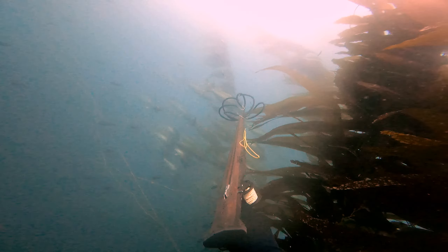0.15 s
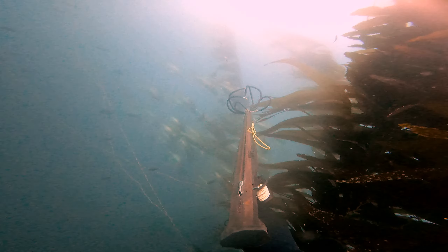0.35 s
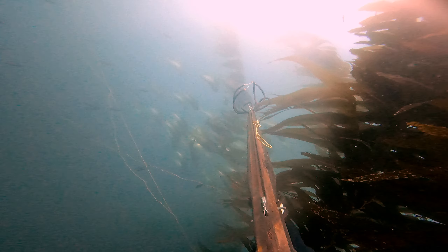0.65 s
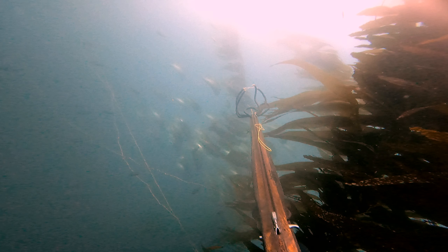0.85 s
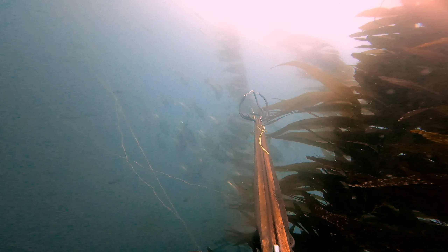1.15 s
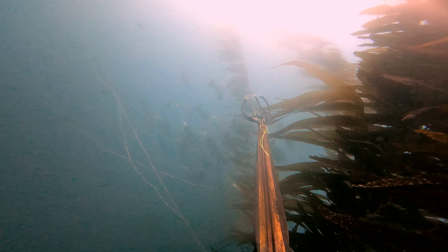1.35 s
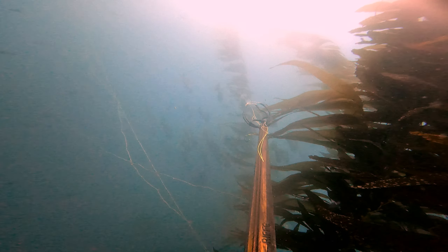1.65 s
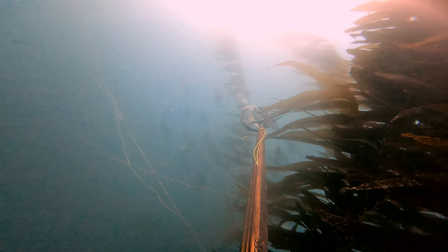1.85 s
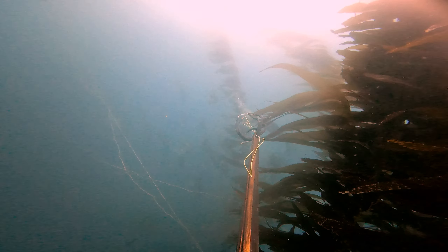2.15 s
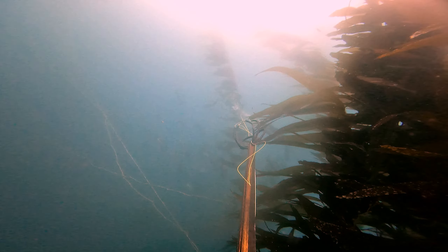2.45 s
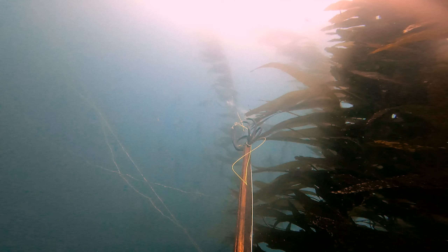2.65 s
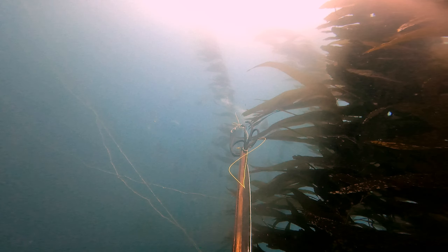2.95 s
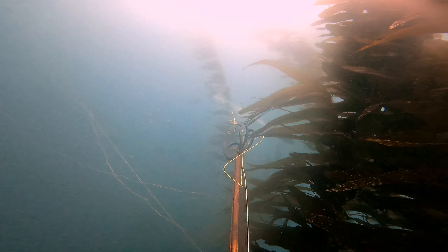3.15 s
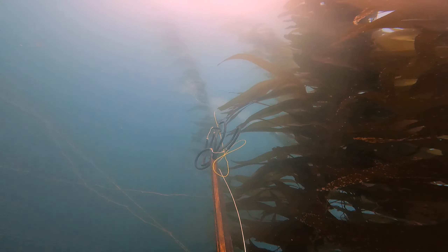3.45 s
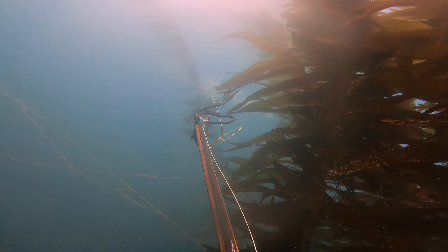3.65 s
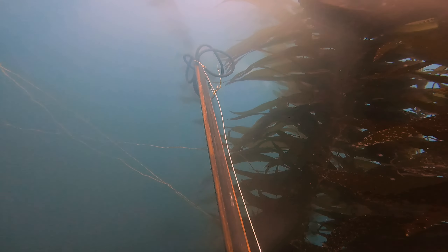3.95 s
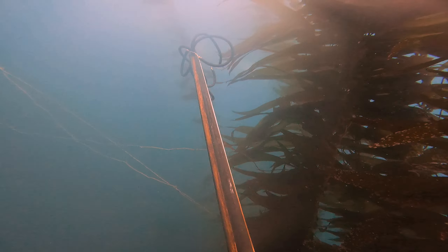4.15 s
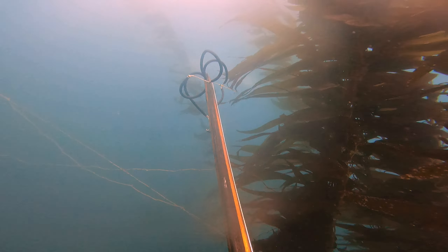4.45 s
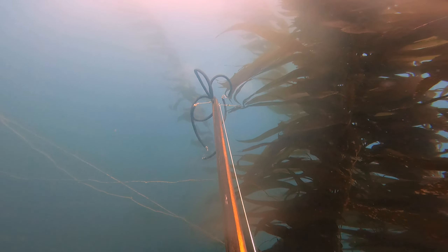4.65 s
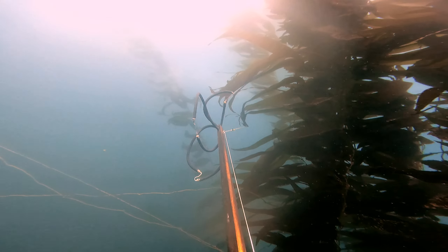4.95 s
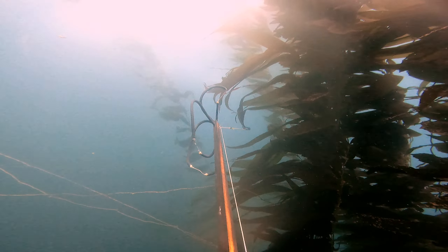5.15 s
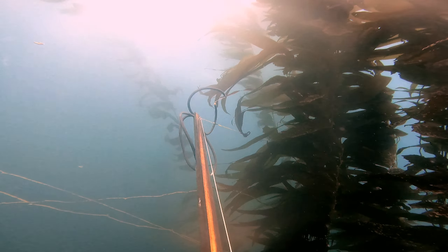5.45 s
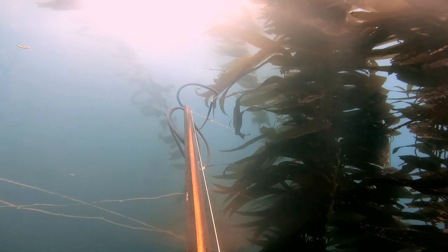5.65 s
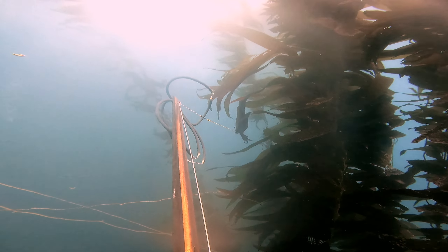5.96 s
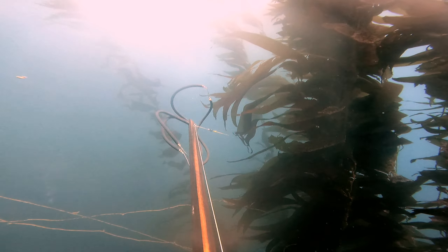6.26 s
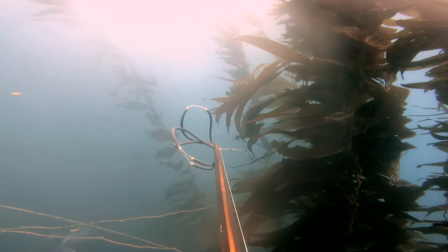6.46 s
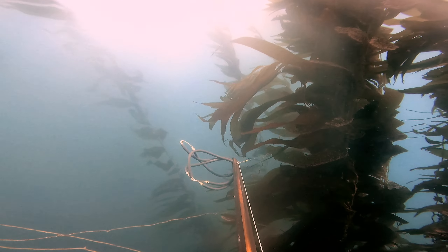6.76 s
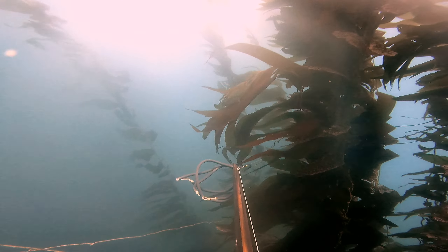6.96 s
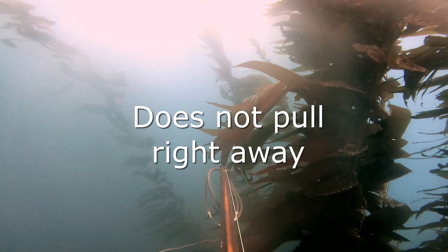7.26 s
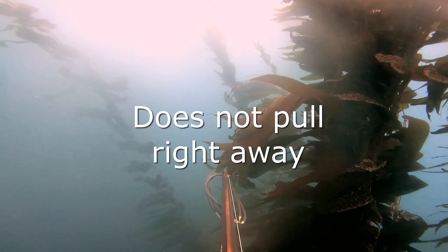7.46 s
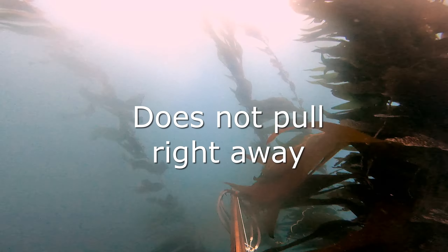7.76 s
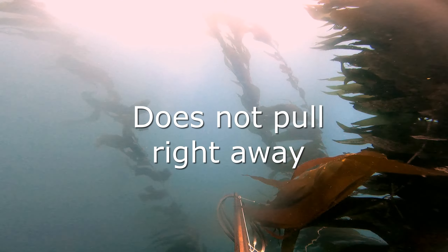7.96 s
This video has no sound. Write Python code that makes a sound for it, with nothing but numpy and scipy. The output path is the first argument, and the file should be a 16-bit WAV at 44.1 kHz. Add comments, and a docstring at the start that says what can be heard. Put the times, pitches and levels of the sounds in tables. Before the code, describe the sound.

Underwater, a rubber-band speargun fires in slow motion with one huge dull thump and low clanks, then normal-speed water rumble, shrimp crackle and small knocks.

```python
"""Under water beside kelp, heard through a camera housing, a rubber-band speargun fires.
The shot is slowed fivefold: decaying low tones thump, steel modes of the shaft clank and its line taps the stock.
At full speed, filtered noise makes water rumble on the housing and line and kelp rub the gun.
Shrimp crackle as scattered clicks; wishbones, line clip and rubber bands ring short modes.
Bubbles chirp as gliding tones, and a squeezed pocket of air gurgles."""
import sys
import numpy as np
from scipy import signal
from scipy.fft import rfft, irfft, next_fast_len
from scipy.io import wavfile
from scipy.ndimage import uniform_filter1d, map_coordinates

SR = 44100
rng = np.random.default_rng(int(sys.argv[2]) if len(sys.argv) > 2 else 0)


def to_wav(sig):
    """Store sig (one row per channel, or 1-D mono) as 16-bit WAV at the path in sys.argv[1].

    Samples outside -1..1 are clipped; the rate is SR.
    """
    pcm = np.clip(np.atleast_2d(sig), -1, 1) * 32767
    pcm = np.round(pcm).astype(np.int16)
    wavfile.write(sys.argv[1], SR, pcm.T)  # frames by channels


N = 357210
TIME = np.arange(N) / SR  # s

FULL_SPEED_AT = 3.212  # s, slow motion before it
SLOW = 5.0  # times longer and lower
EDGE_HZ = 15700  # upper band edge
THUMP_RISE_CYCLES = 0.51  # from the blow to its strongest moment
POCKET_HZ, POCKET_SAG_HZ_PER_S = 276.6, 606  # the air pocket sinks in pitch late in the squeeze

# Spectra give relative density; mode levels are relative too.
# housing resonances: pitch_hz, width_hz, boost_db
HOUSING = [(740, 300, 12), (1250, 90, 3), (2020, 520, 12), (3472, 330, 10.5), (4980, 290, 8.5),
           (7200, 350, 1)]

# dull blows on the stock, as heard: start_s, level_db, settled_pitch_hz
THUMPS = [(0.068, -16.5, 84.2), (0.1384, -3, 65.5), (0.778, -30, 147), (0.84, -36, 156), (1.532, -48, 124),
          (2.401, -42.5, 184), (3.218, -36.5, 245), (4.0008, -16.5, 146.5), (4.02, -26.5, 84.6),
          (4.041, -30, 130), (4.146, -31.5, 122), (4.5, -33, 216), (5.117, -34, 159), (5.244, -35, 151),
          (5.455, -38.5, 260), (5.494, -38.5, 229), (7.57, -26.5, 210), (7.597, -31, 245),
          (7.7274, -18, 180), (8.064, -22.5, 135)]
# recoil rocks the gun: start_s, length_s, level_db, sway_hz
SWAYS = [(0.024, 0.21, -9.5, 4.07), (0.462, 0.19, -8, 4.53)]
# bands, then shaft, rush through the water: start_s, length_s, level_db
RUSHES = [(0, 0.1, -32.5), (.425, 0.037, -36), (.885, 0.021, -47.5)]
# the rush at full speed: pitch_hz, density_db_per_hz
RUSH_SPECTRUM = [(100, -8.5), (250, -4.5), (500, -12), (900, 2.5), (1500, -9), (2500, -19.5), (4500, -22.5),
                 (5600, -28), (8500, -36.5), (10500, -65)]
# the shaft strikes its track: start_s, peak_db, favoured_hz (as heard)
CLANKS = [(0.016, -29, 450), (0.4267, -18.5, 700), (0.4348, -26, 750), (.4475, -35.5, 940),
          (0.509, -31, 1002), (.546, -34, 350), (0.573, -29.5, 403), (0.636, -38.5, 420), (.68, -44.5, 957)]
# steel shaft at full speed: pitch_hz, level_db, t60_s
SHAFT_MODES = [(1290, 13, 0.014), (2070, 1.5, 0.0061), (2817, 2.5, 0.036), (3490, 1.5, 0.0099),
               (4200, -6.5, 0.014), (4980, -2.5, 0.018), (7500, -12, 0.017)]
# contact noise of the shaft at full speed: pitch_hz, density_db_per_hz
SHAFT_CONTACT = [(300, -5.5), (1100, 4), (2500, 0), (5000, -8.5), (7500, -29), (11000, -35), (15500, -40),
                 (17000, -61.5)]
# the shaft slides along its track in slow motion: start_s, length_s, level_db
SLIDES = [(0.47, 0.084, -44)]
# its slowed grinding, as heard: pitch_hz, density_db_per_hz
SLIDE_SPECTRUM = [(80, -13.5), (160, 2.5), (410, 4.5), (490, -15.5), (570, -5), (1000, -23.5),
                  (1400, -33.5), (2000, -49.5)]

# the rubber bands bump the gun: start_s, peak_db, favoured_hz
BUMPS = [(3.67, -49.5, 740), (4.0008, -35, 850), (4.5, -39.5, 700), (4.794, -47.5, 680), (5.008, -48, 740),
         (6.167, -38, 750), (6.1805, -42.5, 900), (6.257, -43, 1300), (6.287, -44, 950), (6.399, -48, 1100),
         (7.567, -46, 520)]
# hollow body of the gun: pitch_hz, level_db, t60_s
BODY_MODES = [(697, 0, 0.033), (846, -5.5, 0.026), (1300, -6, 0.029), (1820, -14.5, 0.023)]
# the wishbones touch the gun: start_s, peak_db, favoured_hz
CLINKS = [(3.9335, -43, 2200), (4.006, -48.5, 2600), (4.4462, -36, 2800), (4.4548, -31.5, 3000),
          (4.4995, -46, 2400), (5.1769, -48.5, 1940), (5.815, -40.5, 2300)]
# steel wishbones on the bands: pitch_hz, level_db, t60_s
WISHBONE_MODES = [(1820, -1, 0.04), (1880, -7.5, 0.036), (2088, 11.5, 0.053), (3430, -5.5, 0.05),
                  (3470, 5.5, 0.064), (4720, -2, 0.033)]
# contact noise of small steel parts: pitch_hz, density_db_per_hz
STEEL_CONTACT = [(300, -20.5), (800, -8.5), (1800, 1.5), (2700, -5.5), (3400, 0.5), (4200, -10), (4800, -7),
                 (5700, -18.5), (7800, -13), (9000, -26), (10000, -36), (15000, -35)]
# loose steel rattles against the muzzle: start_s, length_s, level_db
RATTLES = [(3.633, 0.015, -61), (3.93, 0.017, -62.5), (4.15, 0.069, -60.5), (4.448, 0.018, -52),
           (4.483, 0.022, -58), (5.248, 0.02, -63)]
# the line clip knocks on the stock: start_s, peak_db
KNOCKS = [(7.011, -28.5), (7.0202, -31), (7.029, -41), (7.129, -45)]
# the line clip: pitch_hz, level_db, t60_s
LINE_CLIP_MODES = [(872, 7, 0.053), (1210, 11, 0.035), (1324, 6, 0.056), (1525, 1.5, 0.11),
                   (2150, -1, 0.049), (2820, -9, 0.14), (3150, -12, 0.1), (4240, -15, 0.1)]

# the running line taps the stock in slow motion: start_s, peak_db, favoured_hz (as heard)
TAPS = [(1.725, -44, 550), (1.776, -45.5, 567), (1.893, -48.5, 385), (2.396, -51, 513), (2.955, -51, 695),
        (2.988, -45.5, 654)]
# the stock at full speed: pitch_hz, level_db, t60_s
STOCK_MODES = [(1904, 0.5, 0.022), (2207, 3, 0.029), (2785, -1.5, 0.026), (3573, -0.5, 0.02),
               (5250, -16, 0.031)]
# line runs out behind the shaft in slow motion: start_s, length_s, level_db
RUN_OUT = [(1.72, 0.06, -64), (2.38, 0.49, -71)]
# its slowed rubbing, as heard: pitch_hz, density_db_per_hz
RUN_OUT_SPECTRUM = [(300, -18.5), (440, 10), (570, 8.5), (680, 2.5), (800, -13.5), (1100, -19.5),
                    (1800, -44)]
# line slides along the gun: start_s, length_s, level_db
RUBS = [(6.22, 0.073, -62), (6.6, 0.67, -57)]
# rubbing of the line: pitch_hz, density_db_per_hz
RUB_SPECTRUM = [(250, 0.5), (870, 9), (1050, 1.5), (1350, 4.5), (1700, 4), (2000, -19.5), (3000, -12.5),
                (3600, -25), (4400, -10), (9000, -38)]
# the taut line scrapes through its guide: start_s, length_s, level_db
SCRAPES = [(5.817, 0.0053, -57.5), (6.287, 0.0061, -59), (6.627, 0.014, -58), (6.863, 0.012, -54.5),
           (6.913, 0.004, -62), (7.202, 0.0091, -58.5)]
# sound of the guide: pitch_hz, density_db_per_hz
GUIDE_SPECTRUM = [(1000, -8), (2500, -6.5), (2900, 3.5), (3300, -8), (4200, 6.5), (5000, -7), (5700, -12.5),
                  (6600, -13), (8500, -27.5), (10000, -42)]
# kelp fronds brush the gun: start_s, length_s, level_db
BRUSHES = [(4.02, 0.024, -54), (4.39, 0.07, -51.5), (5.0, 0.045, -62.5), (7.6, 0.11, -52.5),
           (7.83, 0.2, -61)]
# brushing of the kelp: pitch_hz, density_db_per_hz
KELP_SPECTRUM = [(200, -8), (330, 8.5), (500, -9), (730, 6.5), (900, -18.5), (1200, -24), (6000, -37)]

# trapped air is squeezed out, one row: start_s, length_s, level_db
SQUEEZE = (7.6, 0.293, -41.5)
# small bubbles break from it in spurts: start_s, length_s, level_db
SPURTS = [(7.64, 0.094, -52), (7.83, 0.29, -64)]
# jolts shake loose clouds of tiny bubbles: start_s, length_s, peak_db, middle_hz
SPRAYS = [(3.327, 0.13, -59, 3520), (5.816, 0.07, -52.5, 1900), (6.268, 0.1, -49.5, 950),
          (7.035, 0.077, -46, 1644)]
# single bubbles, as heard: start_s, level_db, initial_pitch_hz, length_s, glide_octaves
CHIRPS = [(0.173, -55, 1368, 0.013, 0), (0.36, -65, 1510, .03, -0), (1.864, -71, 1660, 0.041, 0),
          (2.505, -67, 1136, 0.093, 0.05), (2.563, -70.5, 1340, 0.056, -0),
          (3.322, -61.5, 3330, 0.021, 0.47), (3.341, -59, 2445, 0.046, 0.064),
          (3.47, -65.5, 3700, 0.023, 0.9), (7.646, -45, 643, 0.029, -0.2), (7.71, -44, 575, 0.021, 0.1),
          (7.708, -48.5, 940, 0.05, 0.08)]

# the nearest snaps, mostly shrimp: start_s, peak_db, favoured_hz
SNAPS = [(4.308, -50.5, 1800), (4.1986, -51, 2000), (4.227, -54, 4600), (4.9785, -49, 5000),
         (5.267, -45, 4660), (5.64, -47, 5400), (6.132, -49, 1800), (6.627, -44, 5200), (7.235, -46, 2800)]
# far shrimp before the housing: pitch_hz, density_db_per_hz
FAR_SHRIMP = [(200, -14.5), (350, 5.5), (500, -1), (800, 0.5), (1100, -0.5), (1500, -5), (2500, -8),
              (4200, -13.5), (6000, -20), (8500, -28), (10000, -51.5), (15000, -45.5)]
# near shrimp before the housing: pitch_hz, density_db_per_hz
NEAR_SHRIMP = [(300, -23.5), (700, 3), (1400, 4.5), (2500, 1), (4500, -4.5), (6500, -6.5), (8600, -7),
               (10000, -37), (15000, -42.5)]
# common level curve of far and near shrimp: time_s, level_db
SHRIMP_LEVEL = [(0, -51), (.8, -52.5), (1.58, -67.5), (1.74, -57), (3.12, -63), (3.25, -58.5), (5.2, -59),
                (6.8, -62.5), (7.8, -58.5), (8.1, -51)]
# water washes past as the gun swings round: start_s, length_s, level_db
WASHES = [(7.895, 0.25, -63)]
# its hiss before the housing: pitch_hz, density_db_per_hz
WASH_SPECTRUM = [(1400, 5), (2000, -7), (3550, -3), (4300, -8), (9000, -21.5)]
# the gun moves and water surges over the housing: start_s, length_s, level_db (over the resting flow)
SURGES = [(0, 0.36, 12.5), (.52, 0.2, 15), (.96, 0.24, 8.5), (1.77, 0.46, -1), (2.38, 0.048, 6.5),
          (2.71, 0.19, 3), (3.24, 0.16, 10), (4.0, 0.061, 10.5), (4.4, 0.013, 8), (6.32, 0.074, 8),
          (6.58, 0.65, 8.5), (7.65, 0.097, 9.5), (7.98, 0.11, 13.5)]
# the slowed flow, as heard: pitch_hz, density_db_per_hz
SLOW_FLOW = [(6, 7.5), (16, -3.5), (35, -10.5), (70, -27.5), (110, -37.5), (250, -65.5)]
# full-speed flow on the housing: pitch_hz, density_db_per_hz
FLOW = [(12, -1), (28, 4), (55, -3.5), (80, -13), (115, -21), (200, -33.5), (330, -39.5), (600, -58)]
# eddies on the housing: pitch_hz, density_db_per_hz
EDDIES = [(50, -22.5), (100, -8.5), (155, 3.5), (220, -8.5), (310, -12), (420, -22.5), (600, -33.5),
          (1200, -50)]


def recoil():
    """Oscillation: the recoiling gun rocks at a few hertz while each sway swells and dies."""
    out = np.zeros(N)
    for s, length, db, hz in SWAYS:
        swell = strokes([(s, length, db)], rise_s=0.023, fall_s=0.042)
        out += swell * np.cos(2 * np.pi * hz * (TIME - s))
    return out


def rush():
    """Turbulence: bands and shaft tear through water as clicks and noise, slowed."""
    tear = unit(grains(350, 1.9) + 1.7 * rng.standard_normal(N))
    gain = strokes(RUSHES, rise_s=0.021, fall_s=0.039)
    return gain * unit(colour(tear, RUSH_SPECTRUM, SLOW, housed=True))


def thumps(sag=0.043, push=0.19):
    """Heavy damping: water stills each blow within a few cycles, and its pitch sags as it dies."""
    out, t = np.zeros(N), np.arange(SR // 3) / SR
    for s, db, hz in THUMPS:
        u = t * hz / THUMP_RISE_CYCLES
        turns = np.cumsum(hz * (1 + sag * np.exp(-u / 2))) / SR
        envelope = (u * np.exp(1 - u)) ** 1.17
        add(out, s, amp(db) * envelope * (push - np.sin(2 * np.pi * turns)))
    return out


def clanks(crack_db=0.0, contact_s=0.00026, octaves=2.3):
    """Modal excitation: the shaft's slowed steel modes ring above a rough contact crack."""
    out, t = np.zeros(N), np.arange(SR // 2) / SR / SLOW
    cushion = 1 - np.exp(-t / contact_s)  # water cushions the first touch
    for s, db, hz in CLANKS:
        crack = colour(burst(t, 0.00077, 0.01, -20) * cushion, SHAFT_CONTACT, SLOW)
        lowpass = signal.butter(6, 1500, fs=SR, output="sos")
        steel = signal.sosfilt(lowpass, ring(t, SHAFT_MODES) * cushion)
        blow = peaked(steel, 0) + peaked(crack, crack_db)
        add(out, s, peaked(struck(blow, hz, octaves), db))
    return out


def bumps(octaves=0.7, contact_s=0.0006, crack_db=-4.5):
    """Soft impact: rubber rings only the low, hollow modes of the gun."""
    out, t = np.zeros(N), np.arange(SR // 6) / SR
    cushion = 1 - np.exp(-t / contact_s)
    slap_spectrum = [(300, -11.5), (520, -7), (750, 1), (1400, -6.5), (2600, -13.5), (8000, -18.5)]
    for s, db, hz in BUMPS:
        slap = colour(burst(t, 0.0026, 0.031, -12.5) * cushion, slap_spectrum)
        bump = peaked(ring(t, BODY_MODES) * cushion, 0) + peaked(slap, crack_db)
        add(out, s, peaked(struck(bump, hz, octaves), db))
    return out


def clinks(octaves=0.71, crack_db=4.0, contact_s=0.00048):
    """Modal excitation: a rough clack through the housing, with a short ring of the wishbone."""
    out, t = np.zeros(N), np.arange(SR // 4) / SR
    cushion = 1 - np.exp(-t / contact_s)
    for s, db, hz in CLINKS:
        clack = colour(burst(t, 0.0015, 0.036, -26.0) * cushion, STEEL_CONTACT, housed=True)
        touch = peaked(ring(t, WISHBONE_MODES) * cushion, -3.5) + peaked(clack, crack_db)
        add(out, s, peaked(struck(touch, hz, octaves), db))
    return out


def rattles(per_s=600, spread_db=5.5):
    """Repeated impact: many tiny steel contacts are coloured by the housing."""
    contacts = grains(per_s, spread_db) + 0.42 * rng.standard_normal(N)
    gain = strokes(RATTLES, rise_s=0.002, fall_s=0.013)
    return gain * unit(colour(contacts, STEEL_CONTACT, housed=True))


def knocks(crack_db=4, contact_s=0.00023):
    """Modal excitation: the line clip rings as it hits the stock and bounces, with a rough tail."""
    out, t = np.zeros(N), np.arange(SR // 4) / SR
    cushion = 1 - np.exp(-t / contact_s)
    crack_spectrum = [(400, 7.5), (800, -6.0), (1400, 17.5), (2200, 2.5),
                      (4200, 0.0), (5200, -21), (8500, -25), (10000, -52)]
    for s, db in KNOCKS:
        crack = colour(burst(t, 0.002, 0.025, -13), crack_spectrum)
        knock = peaked(ring(t, LINE_CLIP_MODES) * cushion, 0) + peaked(crack, crack_db)
        add(out, s, peaked(knock, db))
    return out


def taps(octaves=0.5, contact_s=0.00044, crack_db=-5):
    """Time stretching: each slowed tap of the line is a hollow knock that rings the stock."""
    out, t = np.zeros(N), np.arange(SR // 3) / SR / SLOW
    cushion = 1 - np.exp(-t / contact_s)
    for s, db, hz in TAPS:
        crack = colour(burst(t, 0.00073, 0.0071, -7.5) * cushion, SHAFT_CONTACT, SLOW)
        knock = peaked(ring(t, STOCK_MODES) * cushion, 0) + peaked(crack, crack_db)
        add(out, s, peaked(struck(knock, hz, octaves), db))
    return out


def rub(rows, spectrum, rise_s, fall_s):
    """Stick-slip friction: a sliding contact sounds as many tiny slips of uneven strength."""
    slips = grains(900, 1.7) + 0.62 * rng.standard_normal(N)
    uneven = slips * amp(2.3 * drift(70))
    return strokes(rows, rise_s, fall_s) * unit(colour(uneven, spectrum))


def gurgle(sag_after_s=0.19, slack_hz=195, small_hz=690, wander=0.1, throb_wander=0.0807,
           throb_db=4, churn=0.88):
    """Bubble resonance: a squeezed pocket throbs and sinks in pitch as small bubbles break from it."""
    sagging_s = np.maximum(TIME - SQUEEZE[0] - sag_after_s, 0)
    pocket_hz = np.maximum(POCKET_HZ - POCKET_SAG_HZ_PER_S * sagging_s, slack_hz)
    turns = np.cumsum(pocket_hz * (1 + throb_wander * drift(90))) / SR
    throb = np.sin(2 * np.pi * turns) * amp(throb_db * drift(70))
    churning = resonate(grains(500, 0.42), pocket_hz * 0.85, 100)
    pocket = unit(unit(throb) + churn * churning) * strokes([SQUEEZE], rise_s=0.015, fall_s=0.05)
    small = resonate(grains(500, 2.0), small_hz * (1 + wander * drift(25)), 190)
    return pocket + small * strokes(SPURTS, rise_s=0.05, fall_s=0.032)


def blip(hz, cycles, rise):
    """Bubble resonance: one bubble rings briefly and rises in pitch."""
    u = np.arange(int(3 * cycles * SR / hz)) * hz / (cycles * SR)
    envelope = 3 * u * np.exp(1 - 3 * u)
    return envelope * np.sin(2 * np.pi * cycles * (u + rise * u * u / 4))


def sprays(octaves=0.894, cycles=9, rise=0.33, spread_db=12, thinning_db=9, count=70):
    """Superposition: a jolt frees a cloud of tiny bubbles, fainter as it goes."""
    out = np.zeros(N)
    for s, length, db, hz in SPRAYS:
        cloud = np.zeros(SR // 2)
        for when, size, faint in rng.random((count, 3)):
            bubble = blip(hz * 2 ** (octaves * (2 * size - 1)), cycles, rise)
            add(cloud, when * length, amp(-spread_db * faint - thinning_db * when) * bubble)
        add(out, s, peaked(cloud, db))
    return out


def chirps(waver=0.025):
    """Frequency modulation: each tiny bubble rings with an unsteady pitch, gliding where its row says."""
    out = np.zeros(N)
    for s, db, hz, length, glide in CHIRPS:
        u = np.linspace(0, 1, int(length * SR))
        pitch = hz * 2 ** (glide * u) * (1 + waver * drift(8 / length)[:len(u)])
        add(out, s, amp(db) * np.sin(np.pi * u ** 0.34) * np.sin(2 * np.pi * np.cumsum(pitch) / SR))
    return out


def snaps(octaves=0.54, crack_s=0.00096, tail_s=0.016, tail_db=-17, contact_s=0.00067):
    """Impulse and scattering: a near snap is a smeared crack and its tail through the housing."""
    out, t = np.zeros(N), np.arange(SR // 5) / SR
    for s, db, hz in SNAPS:
        crack = burst(t, crack_s, tail_s, tail_db) * (1 - np.exp(-t / contact_s))
        add(out, s, peaked(struck(colour(crack, NEAR_SHRIMP, housed=True), hz, octaves), db))
    return out


def click(db=-38, decay_s=0.0015):
    """Step discontinuity: a sharp click as the sound jumps to full speed."""
    return amp(db) * (TIME >= FULL_SPEED_AT) * np.exp(-abs(TIME - FULL_SPEED_AT) / decay_s)


def wash():
    """Turbulence: fast water hisses along the housing."""
    hiss = unit(colour(rng.standard_normal(N), WASH_SPECTRUM, housed=True))
    return strokes(WASHES, rise_s=0.04, fall_s=0.1) * hiss


def shrimp(slow, hiss_db, crackle_db):
    """Superposition: countless far shrimp merge into a wavering hiss; nearer ones crackle out of it."""
    hiss = colour(rng.standard_normal(N) * amp(1.3 * drift(60 / slow)), FAR_SHRIMP, slow, housed=True)
    hiss = unit(patchy(hiss, patchy_db=3.2))
    warped_s = TIME + 0.004 * drift(7 / slow)  # playing position wanders by milliseconds
    hiss = map_coordinates(hiss, [warped_s * SR], mode="mirror")
    scatter = burst(np.arange(SR // 4) / SR / slow, 0.0012, 0.0068, -17.0)
    clicks = signal.fftconvolve(grains(220 / slow, 2.6), scatter)[:N]
    crackle = unit(colour(clicks, NEAR_SHRIMP, slow, housed=True))
    level = amp(np.interp(TIME, *np.transpose(SHRIMP_LEVEL)))
    return (amp(hiss_db) * hiss + amp(crackle_db) * crackle) * level


def water(spectrum, flow_db, eddy_db, eddy_power, lumpy_db, lumps_per_s, rise_s, fall_s):
    """Flow noise: surges shake the housing, and eddies grow as a power of the flow."""
    flow = np.hypot(1, strokes(SURGES, rise_s, fall_s))
    rumble = unit(colour(rng.standard_normal(N), spectrum))
    eddies = unit(colour(rng.standard_normal(N), EDDIES) * amp(lumpy_db * drift(lumps_per_s)))
    return amp(flow_db) * flow * rumble + amp(eddy_db) * flow ** eddy_power * eddies


def amp(db):
    """Logarithmic level: decibels to gain."""
    return 10 ** (np.asarray(db) / 20)


def unit(x):
    """Normalisation: scales to an rms of one."""
    return x / np.sqrt(np.mean(x ** 2) + 1e-20)


def peaked(x, db):
    """Normalisation: scales to a peak level."""
    return amp(db) * x / abs(x).max()


def add(mix, s, sound):
    """Superposition: mixes a sound in at time s."""
    part = mix[max(round(s * SR), 0):][:len(sound)]
    part += sound[:len(part)]


def colour(x, spectrum, slow=1, housed=False):
    """Minimum-phase filtering by a spectrum and, if housed, the housing; slow lowers every frequency."""
    size = 2 * next_fast_len(len(x))
    hz = np.fft.rfftfreq(size, 1 / SR) * slow
    f, db = np.transpose(spectrum)
    db = np.interp(np.log(hz + 1), np.log(f), db)
    db = db - 40 * np.log10(np.maximum(hz / f[-1], 1))  # 12 dB per octave down past the last point
    if housed:
        db = db + sum(peak / (1 + (2 * (hz - centre) / width) ** 2) for centre, width, peak in HOUSING)
    log_gain = np.log(amp(np.r_[db, db[-2:0:-1]]))
    response = np.exp(np.conj(signal.hilbert(log_gain)))[:len(hz)]  # phase follows from the gain
    return irfft(rfft(x, size) * response)[:len(x)]


def struck(x, hz, octaves):
    """Impact spectrum: a blow favours the range around hz."""
    skirt = 2 ** octaves
    return colour(x, [(hz / 8, -28), (hz / skirt, -8), (hz, 0), (hz * skirt, -8), (16000, -26)])


def drift(per_s):
    """Random fluctuation: joined chance values with an rms of one."""
    s = np.arange(0, TIME[-1] + 1, 1 / per_s)
    return unit(np.interp(TIME, s, rng.standard_normal(len(s))))


def grains(per_s, spread_db):
    """Poisson-like impulses: random clicks, most small and a few large."""
    present = rng.random(N) < per_s / SR
    sizes = amp(spread_db * np.minimum(rng.exponential(1, N), 4))
    return unit(present * rng.choice([-1, 1], N) * sizes)


def burst(t, crack_s, tail_s, tail_db):
    """Exponential decay: a short noise crack and the scatter that follows it."""
    return rng.standard_normal(len(t)) * (np.exp(-t / crack_s) + amp(tail_db) * np.exp(-t / tail_s))


def ring(t, modes):
    """Modal superposition: damped sines, each with a random phase, after one blow."""
    return sum(amp(db - 60 * t / t60) * np.sin(2 * np.pi * (hz * t + rng.random()))
               for hz, db, t60 in modes)


def resonate(x, hz, width):
    """Heterodyne resonance: a steep filter follows the curve hz."""
    turn, r = np.exp(2j * np.pi * np.cumsum(hz) / SR), np.exp(-np.pi * width / SR)
    baseband = signal.lfilter([1], [1, -2 * r, r * r], x / turn)
    return unit((turn * baseband).real)


def patchy(x, patchy_db):
    """Spectral fluctuation: moving water favours now one pitch range, now another."""
    z = signal.stft(x, nperseg=512)[2]
    patches = uniform_filter1d(rng.standard_normal(z.shape), size=9, axis=0)  # across pitch
    patches = uniform_filter1d(patches, size=10, axis=1)  # along time
    return signal.istft(z * amp(patchy_db * unit(patches)))[1][:len(x)]


def strokes(rows, rise_s, fall_s):
    """Power summation: gain of movements that each swell, hold for their length and die away."""
    power = np.zeros(N)
    for s, length, db in rows:
        before, after = np.maximum(s - TIME, 0), np.maximum(TIME - s - length, 0)
        power += (amp(db) * np.exp(-before / rise_s - after / fall_s)) ** 2
    return np.sqrt(power)


def scene():
    """Superposition: gun, line, kelp and bubbles over slowed water that gives way to full speed."""
    gun = recoil() + rush() + clanks() + rub(SLIDES, SLIDE_SPECTRUM, rise_s=0.03, fall_s=0.12)
    gun += thumps() + bumps() + clinks() + rattles() + knocks()
    line = taps() + rub(RUN_OUT, RUN_OUT_SPECTRUM, rise_s=0.024, fall_s=0.11)
    line += rub(RUBS, RUB_SPECTRUM, rise_s=0.36, fall_s=0.13)
    line += rub(SCRAPES, GUIDE_SPECTRUM, rise_s=0.0013, fall_s=0.018)
    kelp = rub(BRUSHES, KELP_SPECTRUM, rise_s=0.023, fall_s=0.065)
    bubbles = gurgle() + sprays() + chirps()

    slowed = water(SLOW_FLOW, flow_db=-36.0, eddy_db=-63.5, eddy_power=1.28,
                   lumpy_db=0.5, lumps_per_s=15, rise_s=0.12, fall_s=0.088)
    slowed += shrimp(SLOW, hiss_db=-0.5, crackle_db=-16)
    running = water(FLOW, flow_db=-40, eddy_db=-51.0, eddy_power=0.48,
                    lumpy_db=2.5, lumps_per_s=45, rise_s=0.056, fall_s=0.18)
    running += shrimp(0.99, hiss_db=-5.0, crackle_db=-12.5)
    speed_up = np.clip((TIME - FULL_SPEED_AT) / 0.004, 0, 1)  # 4 ms crossfade
    bed = (1 - speed_up) * slowed + speed_up * running + click() + wash()
    return (gun + line + kelp + bubbles + snaps() + bed)[None]


def record(dry):
    """Band limitation: a steep linear-phase low-pass at the upper edge of the camera."""
    lowpass = signal.firwin(511, EDGE_HZ, window=("kaiser", 9), fs=SR)
    return signal.oaconvolve(dry, lowpass[None], "same")


dry = scene()
out = record(dry)
to_wav(out)
```